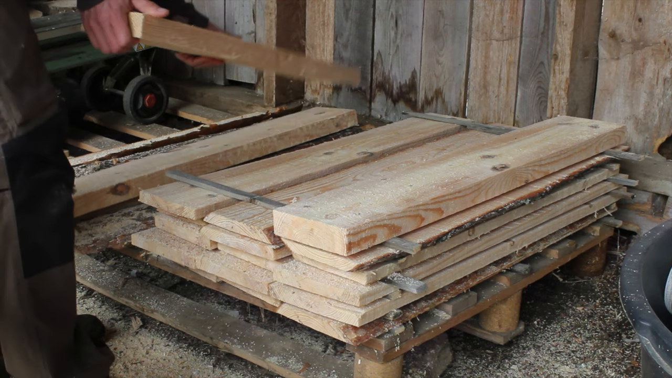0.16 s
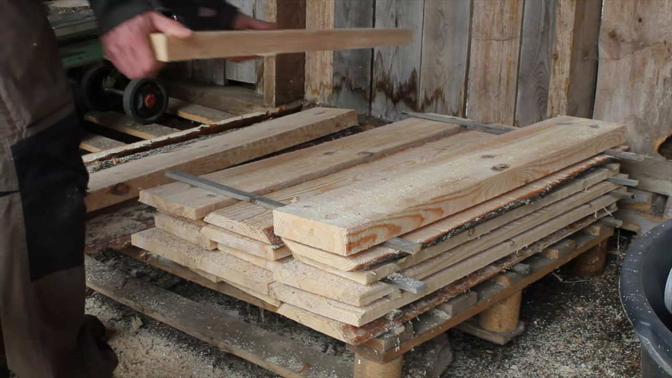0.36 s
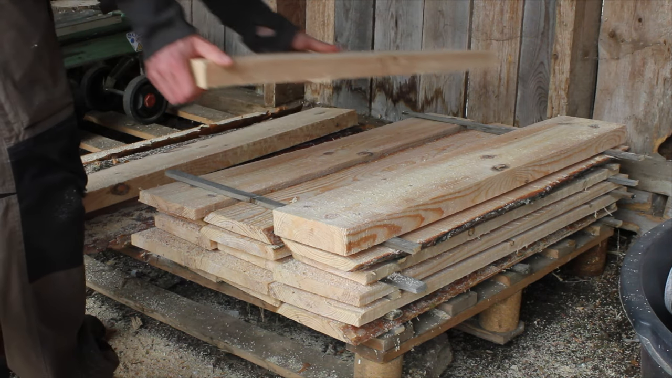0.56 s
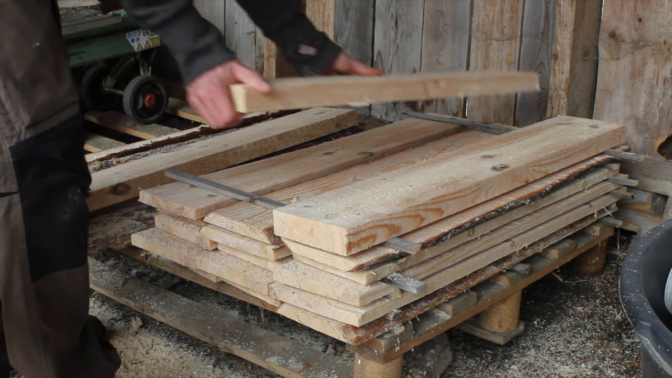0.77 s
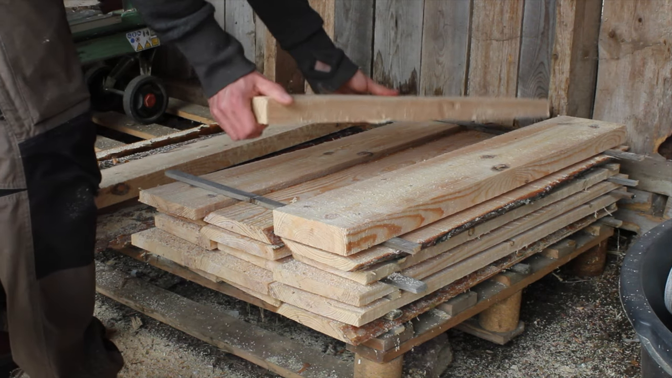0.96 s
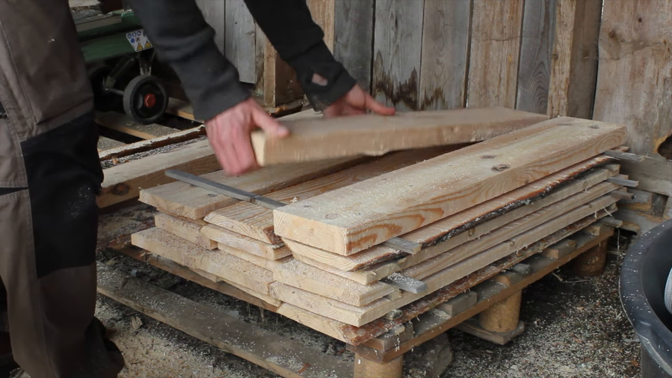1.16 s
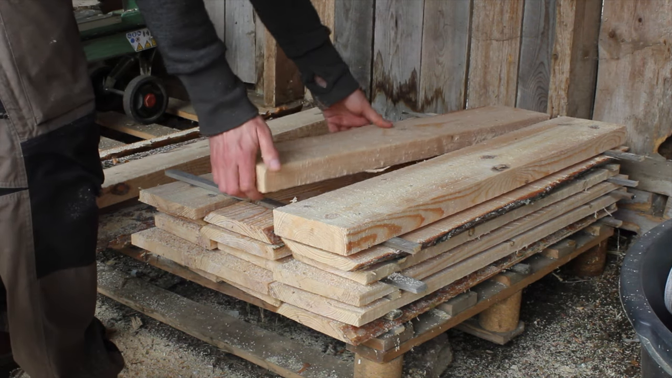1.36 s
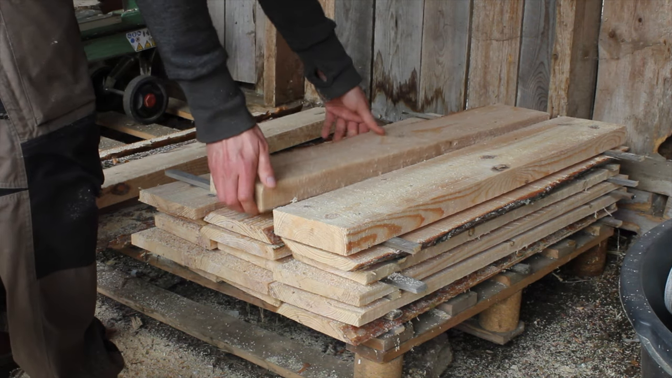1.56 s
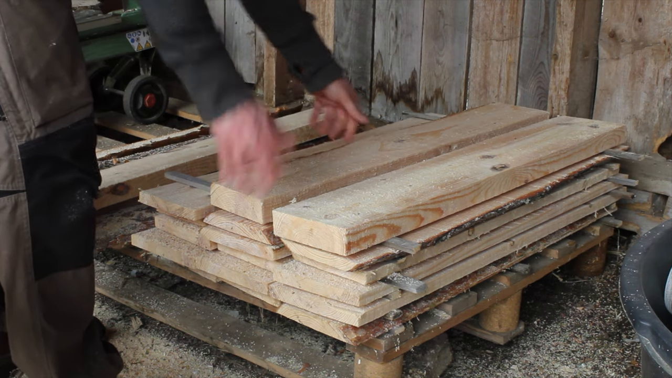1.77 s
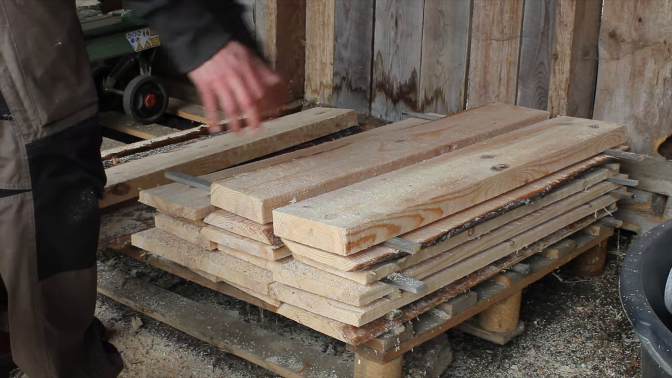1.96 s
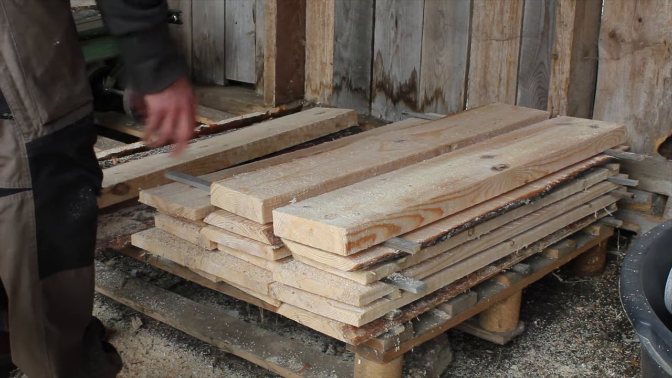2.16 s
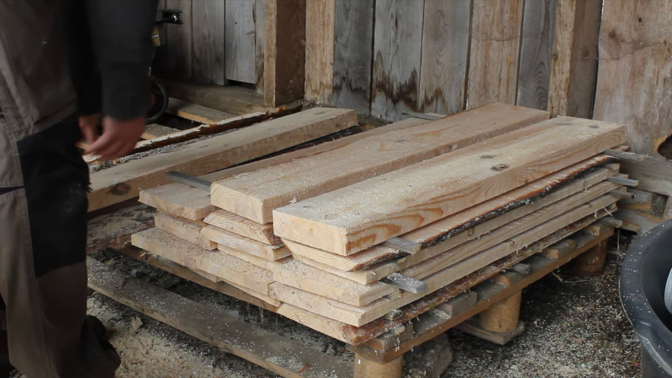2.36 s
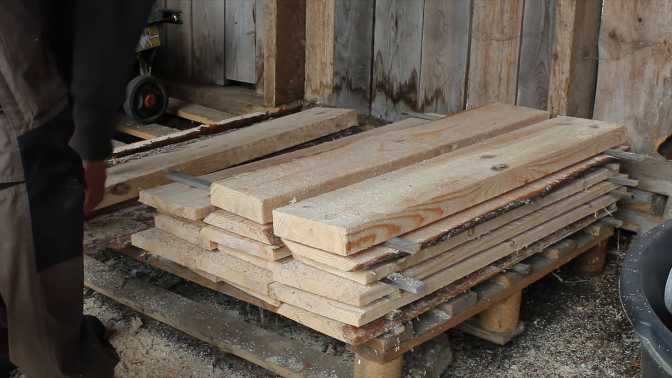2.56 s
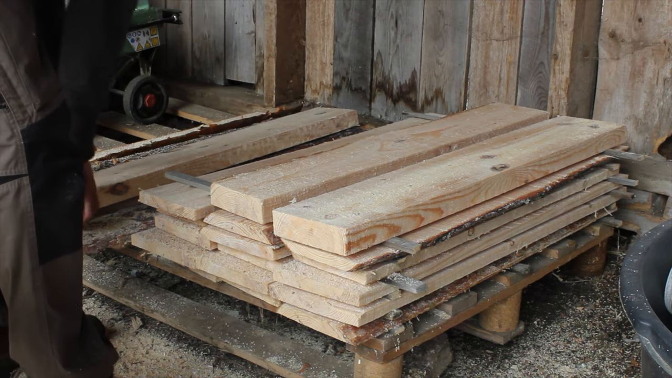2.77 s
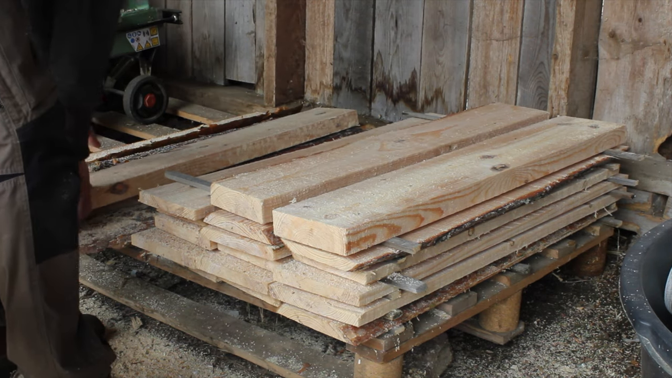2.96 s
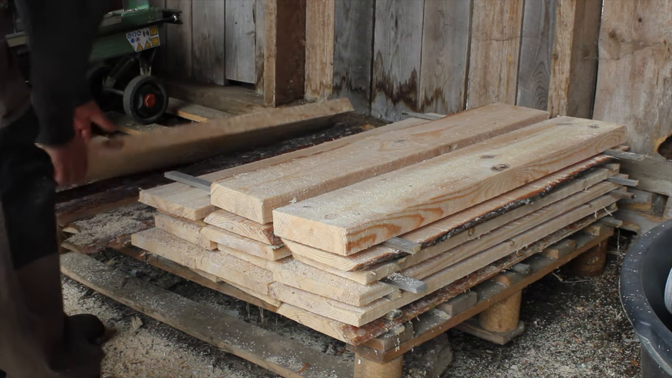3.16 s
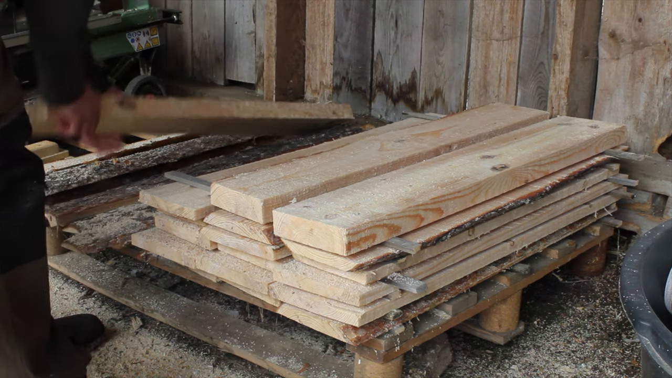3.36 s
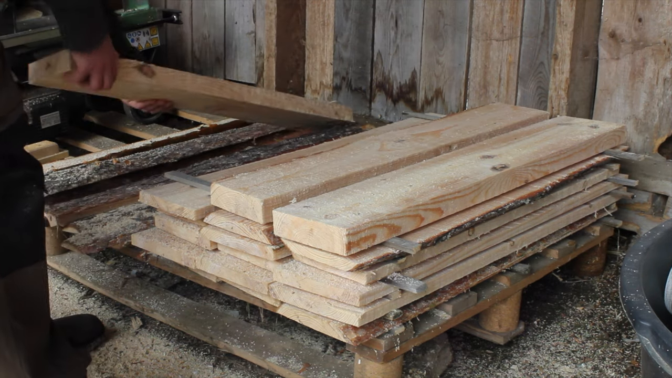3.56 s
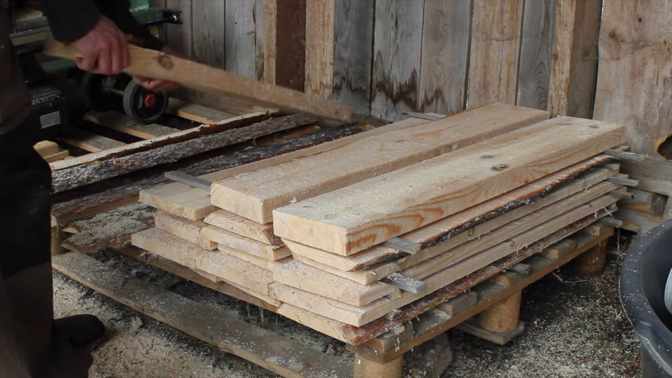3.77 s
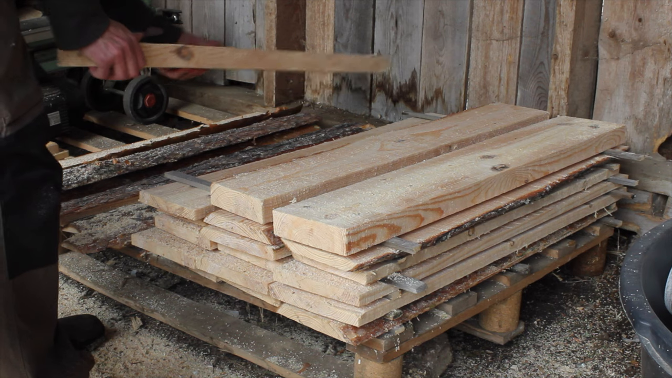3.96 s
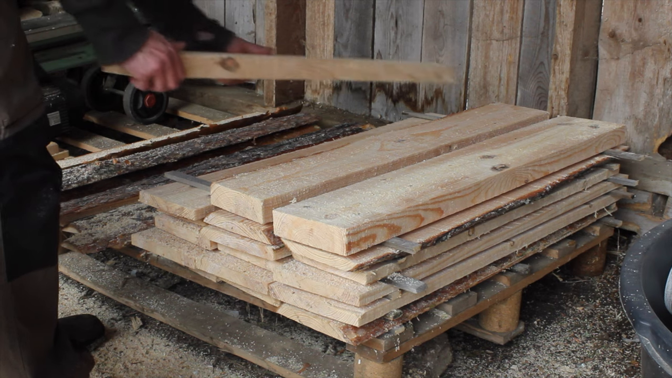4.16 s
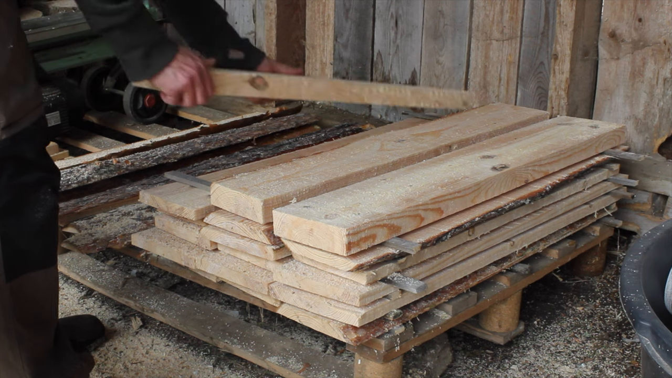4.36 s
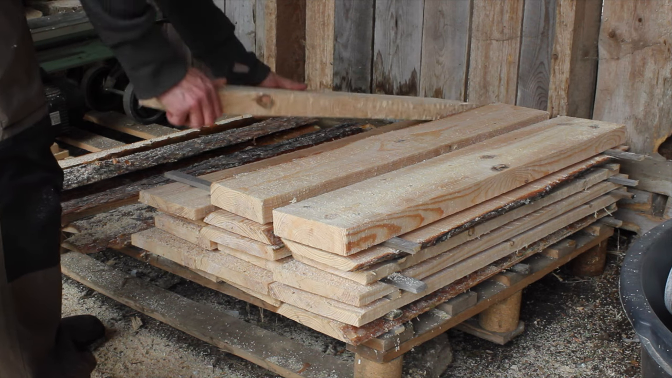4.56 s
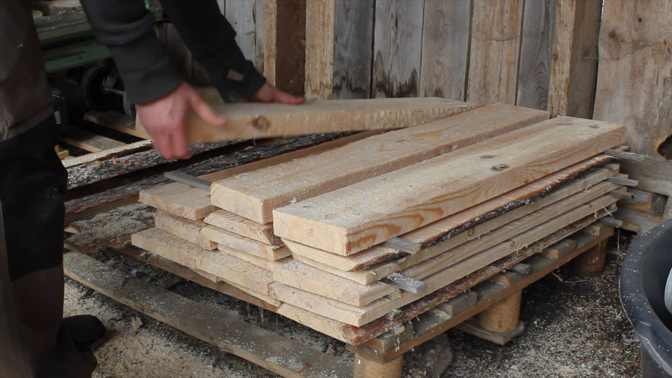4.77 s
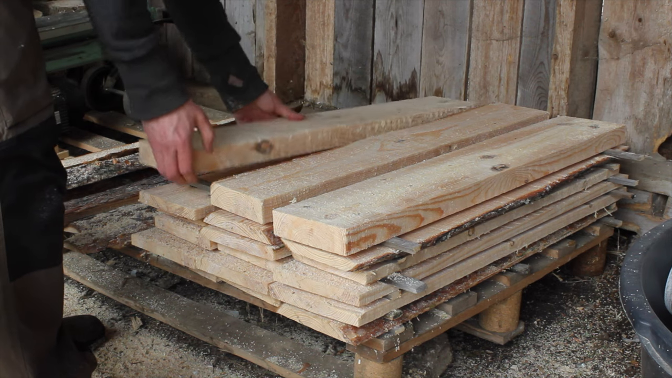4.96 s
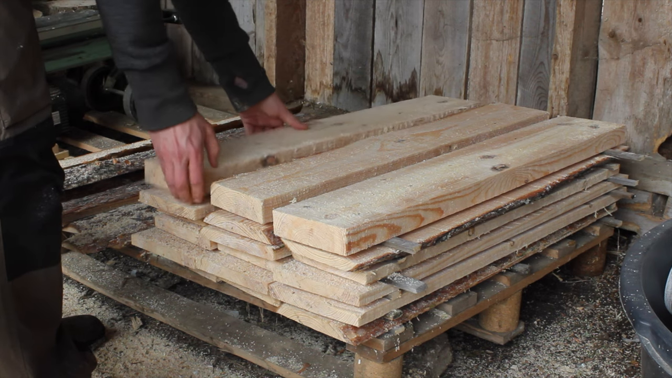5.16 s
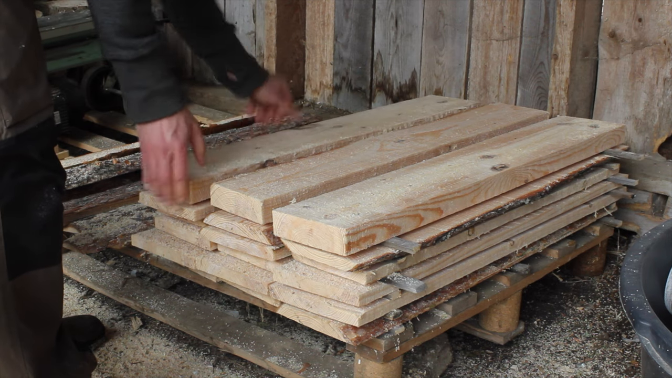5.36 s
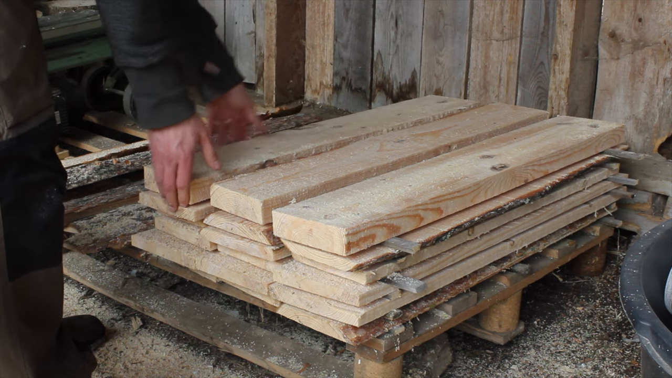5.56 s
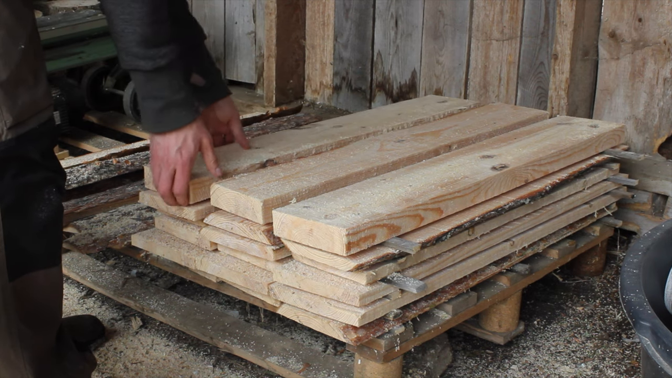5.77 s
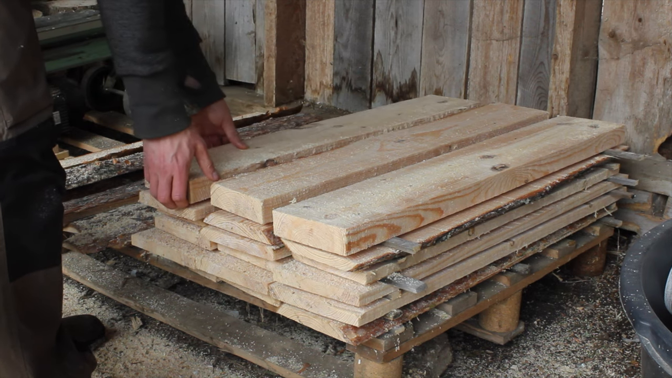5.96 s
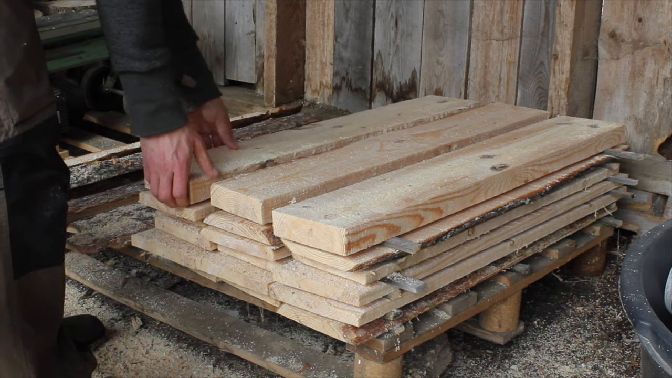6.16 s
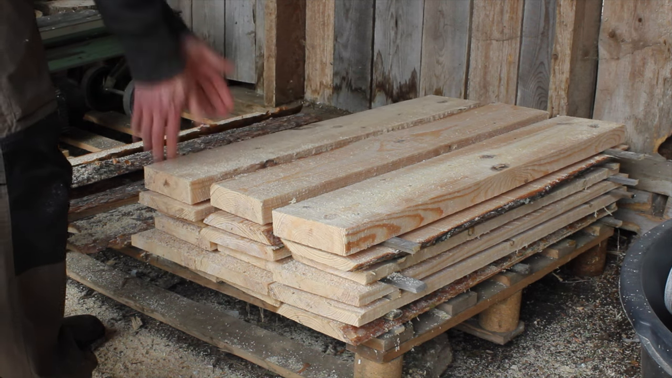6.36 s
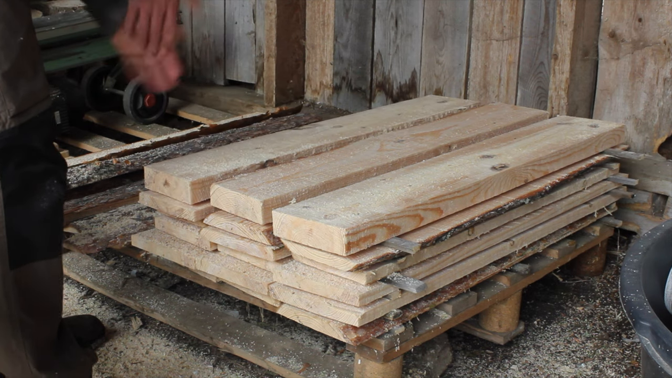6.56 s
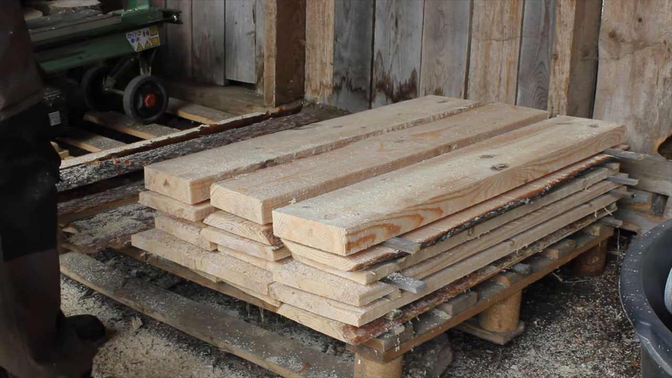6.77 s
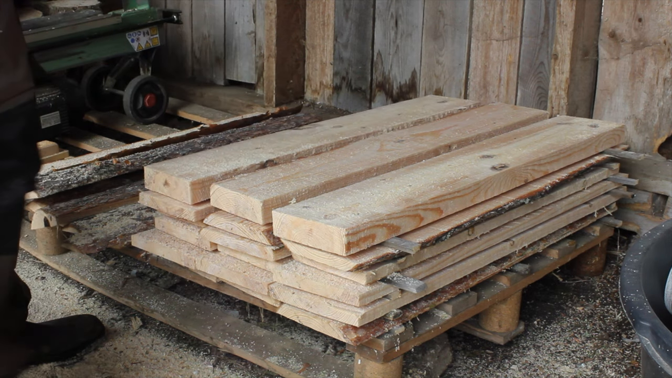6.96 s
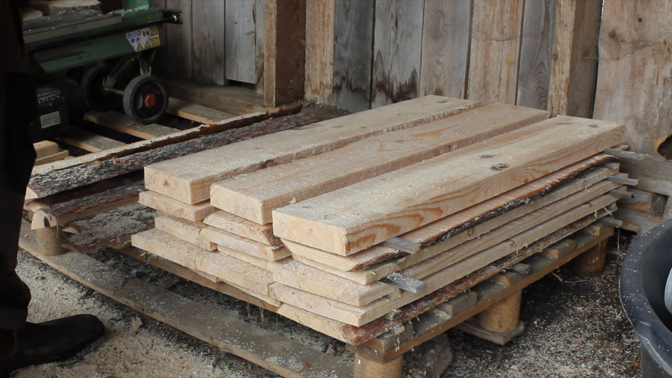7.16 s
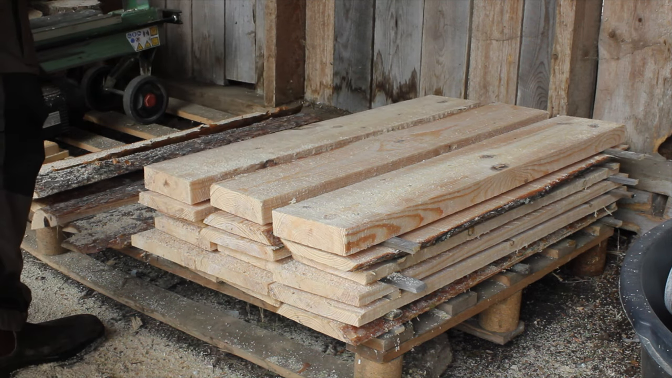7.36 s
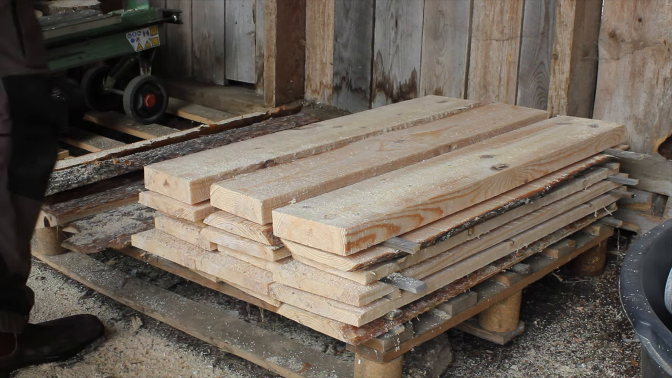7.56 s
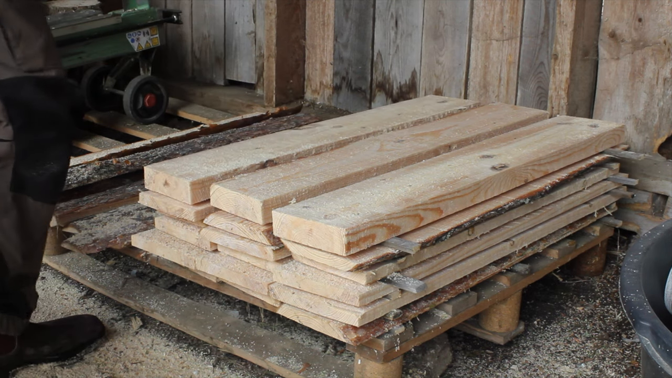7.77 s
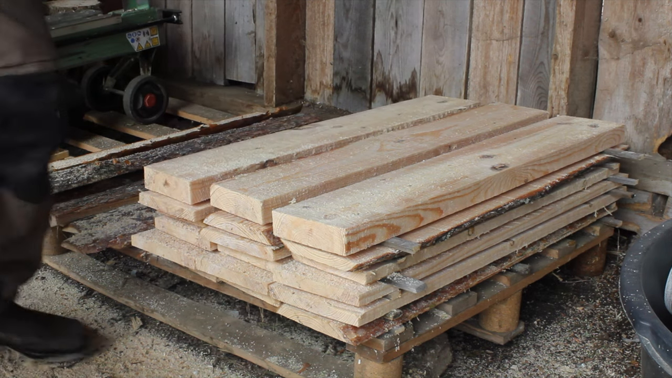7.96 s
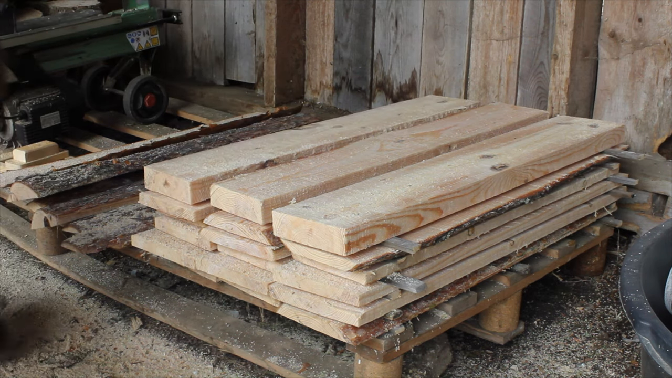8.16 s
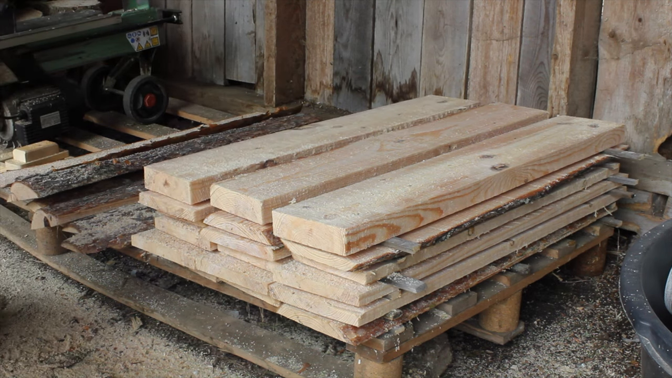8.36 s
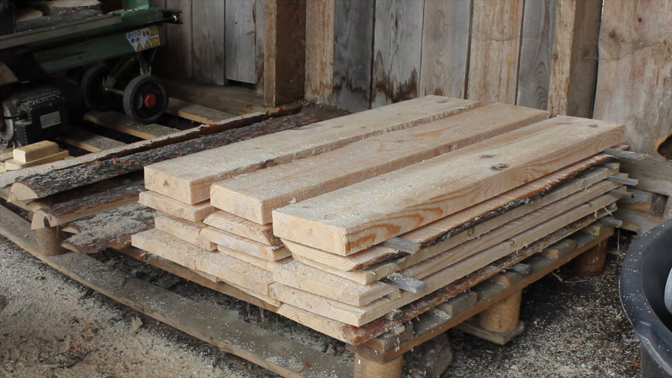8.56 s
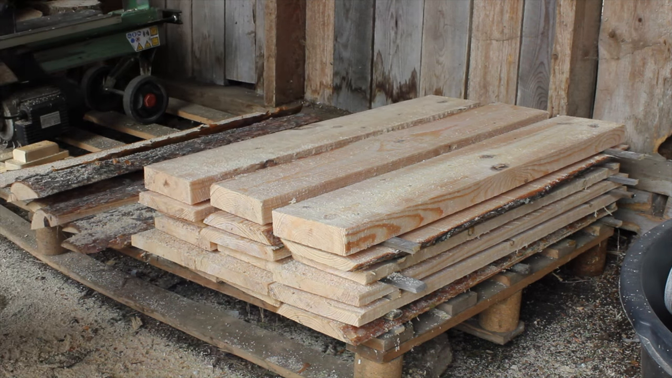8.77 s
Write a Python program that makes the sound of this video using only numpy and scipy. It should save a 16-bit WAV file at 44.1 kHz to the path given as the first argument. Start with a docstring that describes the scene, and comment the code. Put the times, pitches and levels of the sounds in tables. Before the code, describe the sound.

Close outdoor perspective with quiet steady air hiss: splinters snap lightly, a board clatters down in two stages, then wood drags and a second board lands with a brighter, louder knock and dull pallet thud. Faint adjusting taps follow. Three dry, glancing palm claps, the last two loudest, slide away in swishes before soft cloth rustle and muffled footsteps.

```python
"""Two sawn boards are laid on a stack in a yard, by a plank wall: damped modes, stack rattle, pallet thud.
Each touches down at its far end, then drops flat and clatters in ever softer, duller rebounds.
Three glancing claps brush off the dust: noise cracks, cupped-air pops, flesh thumps and a dry swish.
Filtered noise makes splinter snaps, grit, wood drags, rustling work clothes and boots on sawdust;
steady coloured noise makes the faint outdoor hiss, joined for a while by a thin high one."""
import sys
import numpy as np
from scipy import signal
from scipy.fft import rfft, irfft, next_fast_len
from scipy.io import wavfile
from scipy.ndimage import map_coordinates

SR = 44100
rng = np.random.default_rng(int(sys.argv[2]) if len(sys.argv) > 2 else 0)


def master(y):
    """Save y as 16-bit WAV."""
    cut = np.clip(np.atleast_2d(y).T, -1, 1)
    pcm = np.round(cut * 32767)  # scale
    wavfile.write(sys.argv[1], SR, pcm.astype(np.int16))


N = 388956
TIME_S = np.arange(N) / SR  # time in the scene
AGE_S = np.arange(SR // 4) / SR  # time since a contact

# distant rush, spectrum: f/Hz, density/(dB per Hz)
AIR_SPECTRUM = [(13, -54), (22, -10), (76, -11), (199, -9), (228, -4.5), (292, -4.5), (467, -1.5),
                (521, -2), (566, -1), (903, 0.5), (981, 2), (1800, -15), (6030, -16.5), (14500, -22.5),
                (15800, -29)]
# boots on soft ground: t/s, level/dB
STEPS = [(.014, -42), (0.053, -48.5), (0.107, -51), (0.188, -53), (7.421, -47.5), (8.49, -55), (8.66, -60),
         (8.771, -53)]
# heel on soft ground, spectrum: f/Hz, density/(dB per Hz)
SOIL_SPECTRUM = [(30, -28), (65, -6), (125, 6), (210, -1), (280, -5.5), (450, -29), (1500, -70)]
# snapping splinters and grit: t/s, level/dB, f/Hz, width/octaves, ring t60/s
SNAPS = [(.018, -38, 6000, 0.87, .004), (.0305, -32, 5600, 0.51, 0.006), (.0345, -34, 7000, 0.55, 0.0062),
         (.101, -45, 1800, 2, 0.044), (.308, -34.5, 5600, .5, 0.005), (.309, -42.5, 4750, .13, .08),
         (.534, -49, 4000, 1.9, 0.01), (3.024, -44.5, 2780, 1, 0.035), (3.076, -38.5, 3100, 1.3, 0.029),
         (3.202, -35.5, 6000, 1.5, .01), (3.279, -43, 3200, 1.8, 0.016), (3.465, -51, 2300, 0.36, .12),
         (3.729, -37.5, 2920, 0.35, 0.0074), (4.376, -41, 12000, .3, .004), (7.909, -40, 7000, 1.2, 0.0088)]
# rough wood drags over wood: fastest moment t/s, level/dB, length/s
DRAGS = [(.05, -52, 0.11), (1.23, -56, .06), (1.662, -50.5, .035), (3.12, -51.5, 0.072),
         (3.22, -40.5, .042), (3.275, -49, 0.053), (3.465, -53, 0.08), (4.635, -55, 0.047),
         (5.19, -51, 0.037)]
# sleeve or trouser leg brushes: fastest moment t/s, level/dB, length/s
BRUSHES = [(.13, -54.5, 0.21), (.79, -63.5, 0.3), (1.39, -62, 0.036), (2.03, -68, 0.15), (2.57, -56, 0.21),
           (2.92, -56, 0.14), (3.51, -64, 0.15), (3.69, -53, 0.14), (4.94, -57, 0.096),
           (6.285, -55.5, 0.026), (6.36, -59, 0.081), (6.95, -57.5, 0.52), (7.37, -59.5, .16),
           (7.66, -53, 0.2), (7.89, -51, 0.086), (8.055, -55.5, 0.044), (8.17, -58, 0.073),
           (8.245, -55.5, 0.067), (8.52, -52, 0.036), (8.65, -48.5, 0.059), (8.77, -53, 0.16)]
# rubbed sawn wood, spectrum: f/Hz, density/(dB per Hz)
SAWN_SPECTRUM = [(88, -33), (150, -3.5), (492, -20.5), (553, -40), (610, -21), (817, -2.5), (883, -12.5),
                 (1140, -4.5), (11100, -17.5), (15800, -22)]
# rubbed work clothes, spectrum: f/Hz, density/(dB per Hz)
FABRIC_SPECTRUM = [(100, -10), (300, 8.5), (900, 1), (2000, 7), (4000, 4), (7000, 0.5), (12000, -0.5),
                   (16000, -10)]
# board meets stack: t/s, knock level/dB, contact brightness f/Hz, pallet thud level/dB,
# fibre crunch level/dB, loss per rebound/dB
FIRST_KNOCKS = [(1.039, -39.5, 1290, -46, -50, 18), (1.076, -41, 1100, -52, -50, 20),
                (1.090, -43.5, 2200, -44.5, -44, 4.5), (1.652, -44, 2000, -62, -62, 20),
                (1.663, -39, 2430, -56, -60, 26), (1.698, -33, 2520, -35, -47.5, 5)]
SECOND_KNOCKS = [(3.203, -47, 3600, -44, -55, 6.4), (4.477, -41.5, 3260, -54, -47.5, 26),
                 (4.488, -41, 2000, -47, -62, 4.5), (4.624, -51, 2700, -70, -58, 16),
                 (5.195, -32.5, 3100, -53, -46, 28), (5.1985, -26, 2850, -39.5, -49, 7),
                 (5.287, -45, 4000, -58, -51.5, 20), (5.336, -51, 3000, -53, -50, 18),
                 (5.638, -55, 3000, -74, -56.5, 14), (5.893, -51.5, 3000, -64, -55.5, 8.8)]
# bending and twisting modes of each board: f/Hz, level/dB, t60/s
FIRST_BOARD_MODES = [(212, -3, 0.34), (250, -7, 0.12), (370, -24, 0.12), (416, -6, 0.15), (466, -12, 0.16),
                     (730, -4, 0.17), (1010, 2, 0.088), (1230, -8, .15), (1520, 1, 0.087), (1645, 8, 0.059),
                     (1840, -3, 0.12), (2010, 0, 0.1), (2400, -20, 0.11), (2650, -18, .12)]
SECOND_BOARD_MODES = [(210, -9.5, 0.079), (248, -11.5, 0.16), (308, -10, 0.19), (481.6, -11, 0.35),
                      (565, -13, 0.21), (698, -15, 0.52), (850, -1, 0.11), (950, 3, 0.073),
                      (1000, 2, 0.067), (1085, -7, 0.21), (1370, -17, 0.11), (1536, -1, 0.062),
                      (1610, -5, 0.066), (1886, -15, 0.16), (2150, -29, 0.15), (2290, 0, 0.093),
                      (2380, -8, 0.14), (2520, -8, 0.11), (2790, 2, 0.059), (2940, -11, .06)]
# many close resonances of the loose stack, spectrum: f/Hz, density/(dB per Hz)
STACK_SPECTRUM = [(60, -25), (180, -0.5), (400, 5), (900, 7), (1600, 2), (2600, -1), (4000, -8),
                  (8000, -38), (15000, -45)]
# stack decay: f/Hz, t60/s
STACK_DECAY = [(120, 0.49), (400, 0.2), (1000, 0.15), (2200, 0.19), (6000, 0.11)]
# modes of the pallet under the stack: f/Hz, level/dB, t60/s
PALLET_MODES = [(66, -16, 0.3), (101.8, -10, 0.42), (130, -2, 0.22), (162.7, -3, 0.27), (199.8, 2.5, 0.17),
                (235, -10, .2), (303, -1, 0.13), (350, -5, 0.14)]
# glancing claps: t/s, crack level/dB, cupped air level/dB, cup f/Hz, flesh level/dB,
# swish at contact level/dB, slide length/s, slide level/dB
CLAPS = [(6.407, -25, -50, 1950, -58, -48, 0.16, -37), (6.7361, -13.5, -27, 1850, -32.5, -31.5, 0.076, -37),
         (7.015, -14, -29, 2460, -37, -32.5, 0.068, -38)]
# sharp meeting of the palms, spectrum: f/Hz, density/(dB per Hz)
CRACK_SPECTRUM = [(100, -10), (300, 1), (1000, 0), (2500, -1), (6000, 8.5), (11000, 6.5), (16000, -10)]
# soft thump of the hands, spectrum: f/Hz, density/(dB per Hz)
FLESH_SPECTRUM = [(40, -42), (80, -12), (130, -1.5), (190, -13), (260, -0.5), (480, 1), (750, -5),
                  (1500, -12), (4000, -50)]
# palm sliding on palm, spectrum: f/Hz, density/(dB per Hz)
SKIN_SPECTRUM = [(300, -23), (900, -7), (1500, -4.5), (2100, -2), (3000, -3.5), (4700, 1.5), (6500, -1.5),
                 (9000, -0.5), (11500, 1.5), (14000, -4), (15800, -5.5)]
# scattered tail of the yard: f/Hz, t60/s
YARD_DECAY = [(200, 0.36), (2000, 0.31), (6000, 0.16), (14000, 0.14)]

AIR_DB = -54.5
THIN_START_S, THIN_END_S, THIN_DB, THIN_FADE_DB_PER_S = 2.84, 3.83, -64, 53
STROKE_SHAPE = 1.38  # 1 pointed, 2 bell-shaped
GRIT_COUNT, GRIT_DB, GRIT_SPREAD_DB = 20, -56.5, 2
REBOUND_DULLING = 0.68  # brightness ratio, rebound to previous contact
CRUNCH_LOSS_DB = 11  # pressed fibres: extra loss per rebound
CRACK_T60_S, SLAP_T60_S, SLAP_DB = 0.004, 0.014, -15
# fingers meet first: softer, lower pop; pitch as a ratio
FINGERS_LEAD_S, FINGERS_DB, FINGERS_PITCH = 0.00609, -9.5, 0.48
SWISH_RISE_DB_PER_S, SWISH_FALL_DB_PER_S = 1900, 330
SLIDE_GROWTH_DB_PER_S, PARTING_DB_PER_S = 88, 420  # palms speed up, then part
TOP_HZ = 15850


def amp(db):
    """Decibels to gain."""
    return 10 ** (np.asarray(db) / 20)


def unit(x):
    """Scale to rms 1."""
    return x / np.sqrt(np.mean(x ** 2) + 1e-20)


def along(points, hz):
    """Read (Hz, value) points on a log frequency axis."""
    f, v = np.transpose(points)
    return np.interp(np.log(hz + 1), np.log(f + 1), v)


def wobble(knots_per_s):
    """Smooth random curve."""
    knots = rng.standard_normal(int(N * knots_per_s / SR) + 4)
    return map_coordinates(knots, [np.arange(N) * knots_per_s / SR])


def fade(t60_s):
    """Exponential decay after a contact, -60 dB at t60."""
    return np.exp(-np.log(1000) * AGE_S / t60_s)


def rise(attack_s):
    """Soft exponential start after a contact."""
    return 1 - np.exp(-AGE_S / attack_s)


def held(start_s, end_s, rise_db_per_s, fall_db_per_s):
    """Gain that rises to 1 at start, holds until end, then falls; floor -200 dB."""
    before_db = rise_db_per_s * np.maximum(start_s - TIME_S, 0)
    after_db = fall_db_per_s * np.maximum(TIME_S - end_s, 0)
    return amp(np.maximum(-before_db - after_db, -200))


def noise(gain, size):
    """Noise of rms 1, shaped by a gain function of frequency."""
    m = next_fast_len(size)
    spectrum = rfft(rng.standard_normal(m)) * gain(np.fft.rfftfreq(m, 1 / SR))
    return unit(irfft(spectrum, m)[:size])


def coloured(spectrum, size):
    """Noise of rms 1 with a (Hz, dB) spectrum."""
    return noise(lambda f: amp(along(spectrum, f)), size)


def burst(hz, octaves, t60_s):
    """Dying band of noise around one resonance."""
    band = noise(lambda f: 1 / (1 + (np.log2((f + 1) / hz) / octaves) ** 2), len(AGE_S))
    return band * fade(t60_s)


def dying(x, decay):
    """Each frequency of x dies at its own speed."""
    hz, t, z = signal.stft(x, SR, nperseg=256)
    loss = np.exp(-np.log(1000) * t / along(decay, hz)[:, None])
    return signal.istft(z * loss, SR, nperseg=256)[1][:len(x)]


def add(track, start_s, sound):
    """Mix a sound into the track in place."""
    part = track[max(round(start_s * SR), 0):][:len(sound)]
    part += sound[:len(part)]


def outdoors():
    """Steady distant rush of coloured noise, plus a thin high hiss for a while."""
    rush = amp(AIR_DB + 0.21 * wobble(3.68)) * coloured(AIR_SPECTRUM, N)
    thin = noise(lambda f: 1 / (1 + ((f - 4200) / 300) ** 2), N)
    thin_gain = amp(THIN_DB + 0.88 * wobble(6.24))
    presence = held(THIN_START_S, THIN_END_S, THIN_FADE_DB_PER_S, THIN_FADE_DB_PER_S)
    return rush + thin_gain * presence * thin


def steps():
    """Heels land dully on sawdust: low noise, soft onset."""
    out = np.zeros(N)
    for t_s, db in STEPS:
        add(out, t_s, amp(db) * coloured(SOIL_SPECTRUM, len(AGE_S)) * fade(0.24) * rise(0.0045))
    return out


def snaps():
    """Splinters catch and bits of grit crack: short resonant noise bursts."""
    out = np.zeros(N)
    for t_s, db, hz, octaves, t60_s in SNAPS:
        add(out, t_s, amp(db) * burst(hz, octaves, t60_s))
    return out


def grit():
    """Crumbs of sawdust and bark tick faintly at random times."""
    out = np.zeros(N)
    for place, strength in zip(rng.random(GRIT_COUNT), rng.standard_normal(GRIT_COUNT)):
        level_db = GRIT_DB + GRIT_SPREAD_DB * strength
        add(out, place * N / SR, amp(level_db) * burst(4200, 2.5, 0.016))
    return out


def friction(spectrum, grain_per_s, grain_db, surge_db):
    """Rubbing noise of rms 1: tiny catches under uneven pressure, coloured by the surface."""
    pressure_db = grain_db * wobble(grain_per_s) + surge_db * wobble(45)
    catches = rng.standard_normal(N) * amp(pressure_db)
    m = next_fast_len(N + SR // 4)
    colour = amp(along(spectrum, np.fft.rfftfreq(m, 1 / SR)))
    return unit(irfft(rfft(catches, m) * colour, m)[:N])


def strokes(rows):
    """Gain of rubbing movements: each swells and fades, above half power over its length."""
    power = np.zeros(N)
    for t_s, db, length_s in rows:
        near = np.abs(TIME_S - t_s) < 4 * length_s
        offset = np.abs(2 * (TIME_S[near] - t_s) / length_s)
        power[near] += amp(db) ** 2 * 0.5 ** (offset ** STROKE_SHAPE)
    return np.sqrt(power)


def handling():
    """Boards drag on the pile and work clothes brush: friction noise gated by strokes."""
    drag = strokes(DRAGS) * friction(SAWN_SPECTRUM, grain_per_s=840, grain_db=-0.2, surge_db=2.3)
    cloth = strokes(BRUSHES) * friction(FABRIC_SPECTRUM, grain_per_s=620, grain_db=1, surge_db=1.25)
    return drag + cloth


def rebounds(knocks, rebound_s, count):
    """Contacts, `count` per knock: the board rocks, each one softer and duller than the last."""
    contacts = []
    for t_s, db, bright_hz, thud_db, crunch_db, loss_db in knocks:
        for k in range(count):
            contacts.append((t_s + k * rebound_s, db - k * loss_db, bright_hz * REBOUND_DULLING ** k,
                             thud_db - k * loss_db, crunch_db - k * (loss_db + CRUNCH_LOSS_DB)))
    return contacts


def ringing(modes, spread_db):
    """Damped modes, starting at rms 1; the point of contact sets each one's share (random)."""
    hz, mode_db, t60_s = np.transpose(modes)
    gains = amp(mode_db + spread_db * rng.standard_normal(len(hz)))
    gains = gains * rng.choice([-1, 1], len(hz))
    ring = sum(g * np.sin(2 * np.pi * f * AGE_S) * fade(d) for g, f, d in zip(gains, hz, t60_s))
    return np.sqrt(2) * ring / np.linalg.norm(gains)


def board(contacts, modes, ring_db, stack_db):
    """Each contact rings the board's modes, rattles the stack, crunches fibres, thumps the pallet."""
    out = np.zeros(N)
    for t_s, db, bright_hz, thud_db, crunch_db in contacts:
        rattle = dying(coloured(STACK_SPECTRUM, len(AGE_S)), STACK_DECAY)
        ring = ringing(modes, spread_db=-0.5)
        blow = (amp(ring_db) * ring + amp(stack_db) * rattle) * rise(0.0013)
        # a flat, soft contact lasts longer: less treble in the blow, but not in the crunch
        lowpass = signal.butter(N=6, Wn=min(bright_hz, SR / 3), fs=SR, output="sos")
        knock = signal.sosfilt(lowpass, blow)
        crunch = burst(4000, 1.9, 0.013) + amp(-1.5) * burst(2500, 1.37, 0.17)
        thud = ringing(PALLET_MODES, spread_db=5.5) * rise(0.0035)
        add(out, t_s, amp(db) * knock + amp(crunch_db) * crunch + amp(thud_db) * thud)
    return out


def pop(cup_hz):
    """Air squeezed from between the hands; its pocket rings on briefly."""
    return burst(cup_hz, 0.61, 0.14) + amp(-4.5) * burst(cup_hz, 0.15, 0.13)


def hands():
    """Each clap cracks, pops the air between the palms, thumps the flesh and slides on as a dry swish."""
    out, rub = np.zeros(N), np.zeros(N)
    for t_s, crack_db, cup_db, cup_hz, flesh_db, swish_db, slide_s, slide_db in CLAPS:
        crack_decay = fade(CRACK_T60_S) + amp(SLAP_DB) * fade(SLAP_T60_S)
        crack = coloured(CRACK_SPECTRUM, len(AGE_S)) * crack_decay
        thump = coloured(FLESH_SPECTRUM, len(AGE_S)) * fade(0.13) * rise(0.0011)
        fingers = pop(cup_hz * FINGERS_PITCH) * rise(0.00083)
        add(out, t_s - FINGERS_LEAD_S, amp(cup_db + FINGERS_DB) * fingers)
        add(out, t_s, amp(crack_db) * crack + amp(cup_db) * pop(cup_hz) + amp(flesh_db) * thump)
        swish = amp(swish_db) * held(t_s, t_s, SWISH_RISE_DB_PER_S, SWISH_FALL_DB_PER_S)
        part_s = t_s + slide_s
        slide = amp(slide_db) * held(part_s, part_s, SLIDE_GROWTH_DB_PER_S, PARTING_DB_PER_S)
        rub += np.hypot(swish, slide * (TIME_S > t_s))
    return out + rub * friction(SKIN_SPECTRUM, grain_per_s=690, grain_db=1.5, surge_db=1.5)


def yard(x, wet_db):
    """Wall, stack and ground scatter a short noise tail that builds over a few milliseconds."""
    tail = dying(rng.standard_normal(len(AGE_S)), YARD_DECAY) * rise(0.0024)
    return x + amp(wet_db) * signal.fftconvolve(x, tail / np.linalg.norm(tail))[:N]


def scene():
    """Boards, hands, boots and clothes in the yard, over the outdoor hiss."""
    first = board(rebounds(FIRST_KNOCKS, rebound_s=0.0245, count=4),
                  FIRST_BOARD_MODES, ring_db=0, stack_db=1)
    second = board(rebounds(SECOND_KNOCKS, rebound_s=0.018, count=3),
                   SECOND_BOARD_MODES, ring_db=1.5, stack_db=-1.0)
    wood = yard(first + second, wet_db=-22) + yard(snaps() + grit(), wet_db=-5.5)
    work = wood + yard(hands(), wet_db=-14.5) + steps() + handling()
    # high-pass: keeps the knocks, hands and steps free of deep bass
    highpass = signal.butter(N=4, Wn=58, btype="high", fs=SR, output="sos")
    return (signal.sosfilt(highpass, work) + outdoors())[None]


def record(dry):
    """Band limit: nothing passes from TOP_HZ up."""
    m = next_fast_len(N + SR // 2)
    passband = np.fft.rfftfreq(m, 1 / SR) < TOP_HZ
    return irfft(rfft(dry, m) * passband, m)[..., :N]


dry = scene()
out = record(dry)
master(out)
```